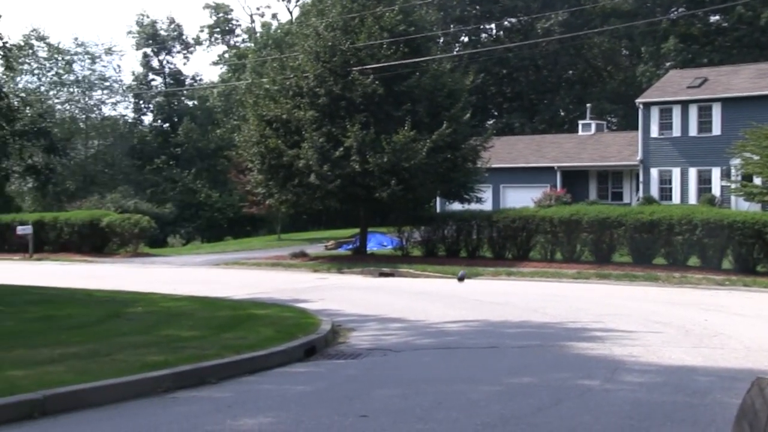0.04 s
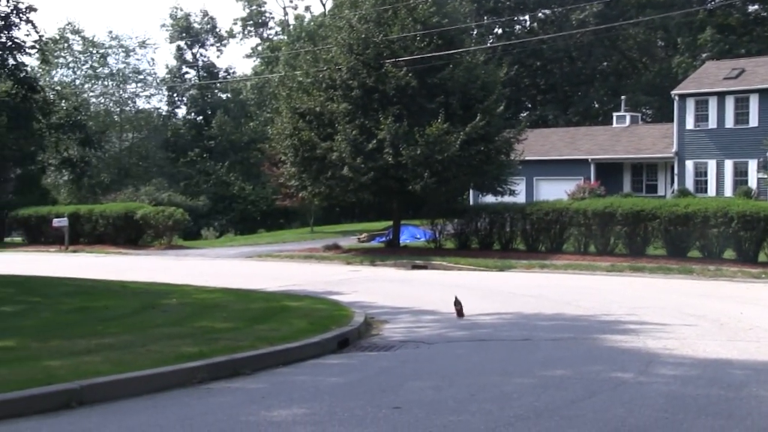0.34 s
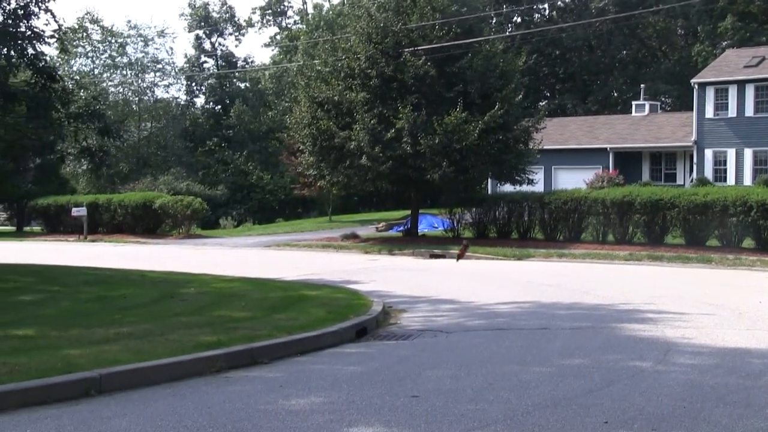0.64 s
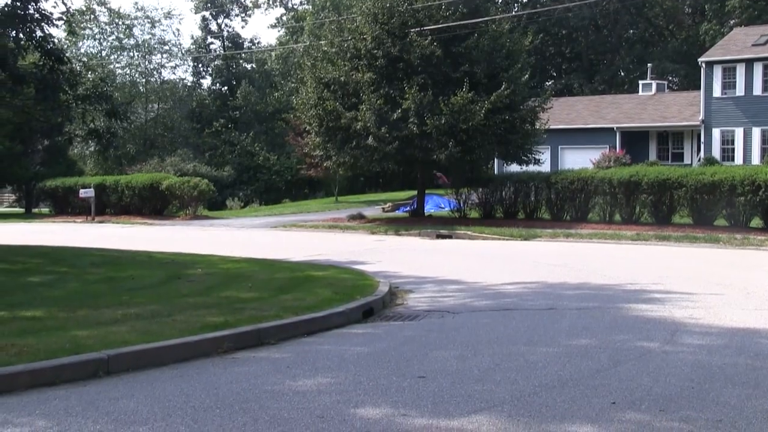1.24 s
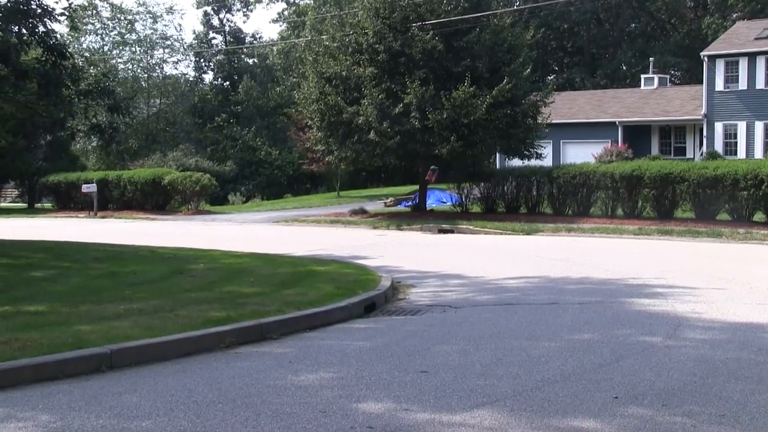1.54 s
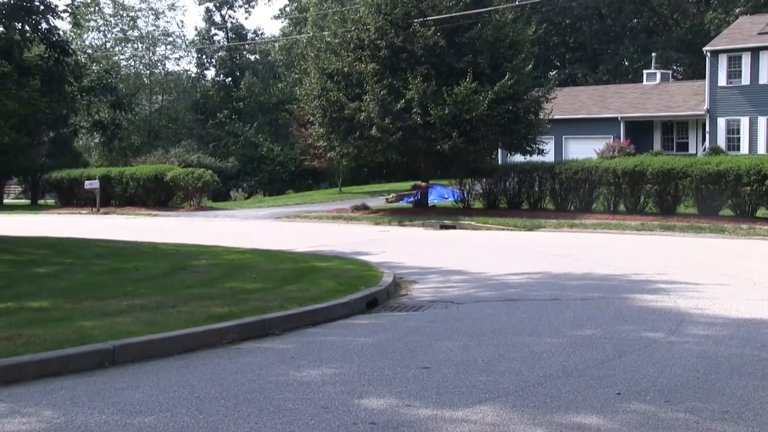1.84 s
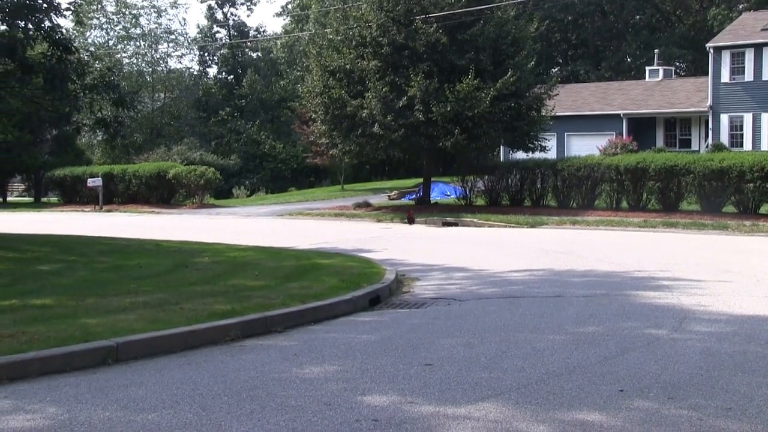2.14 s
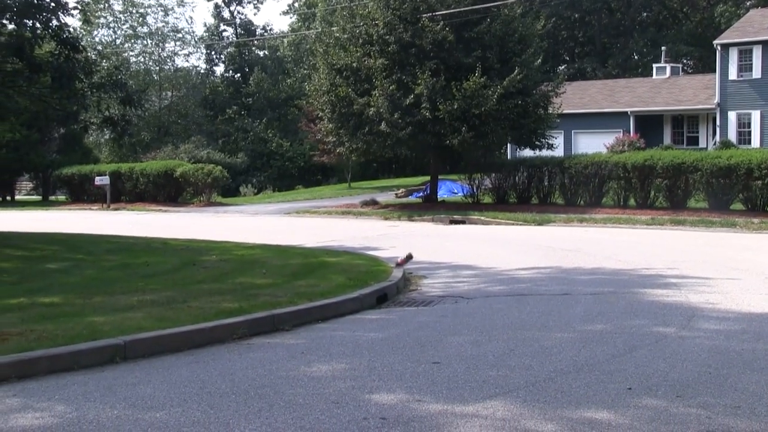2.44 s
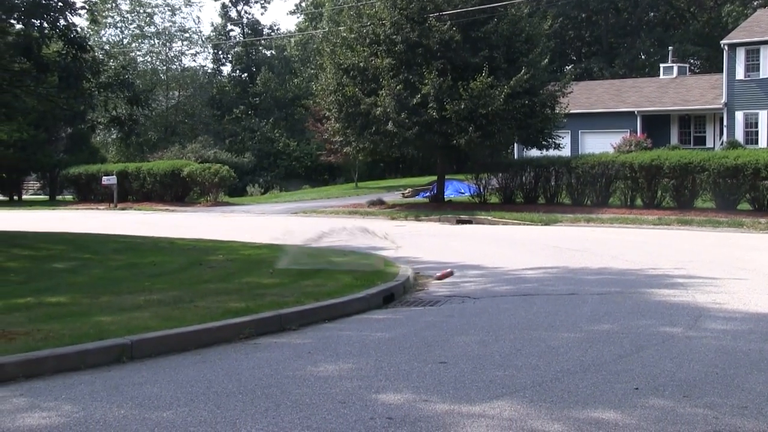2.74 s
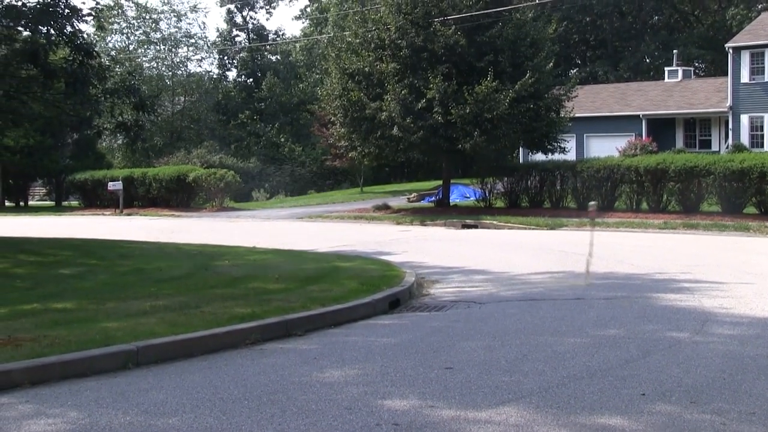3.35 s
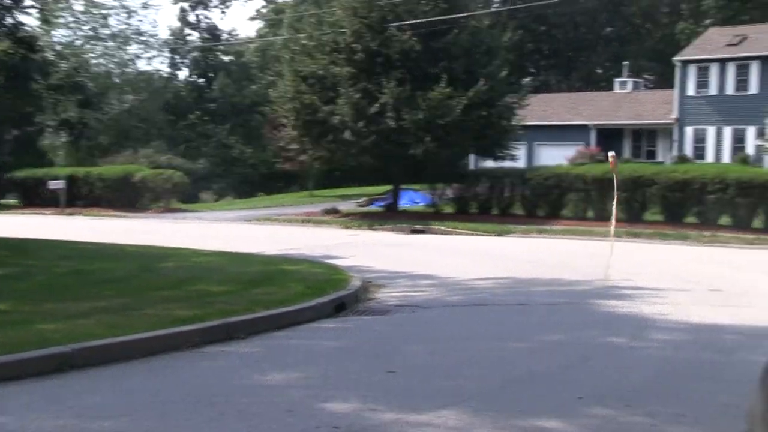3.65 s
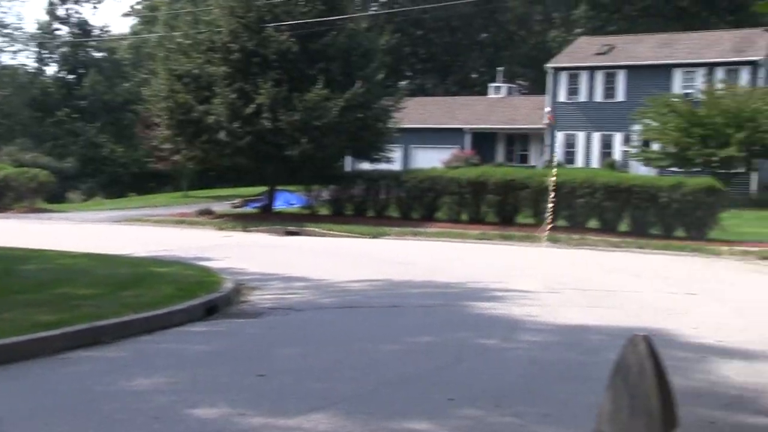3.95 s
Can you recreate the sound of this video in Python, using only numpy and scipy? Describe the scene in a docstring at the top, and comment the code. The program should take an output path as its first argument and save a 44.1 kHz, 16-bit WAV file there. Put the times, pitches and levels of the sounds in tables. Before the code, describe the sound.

A plastic soda bottle smacks onto a street, then bursts with a sputtering, hissing spray.

```python
"""A full plastic soda bottle slams onto a street; its wall buckles with a crack and its body rings.
On the second landing the neck snaps and escaping gas drives out gulps, wet slugs and a sputtering
jet of foam, which thins to hiss and spatter as the bottle flies off, drifting slightly right.
Trees and houses return a diffuse echo. Two faint knocks sound far down the street, and crickets
chirp over the hush of distant traffic and leaves."""
import sys
import numpy as np
from scipy import signal
from scipy.fft import rfft, irfft, next_fast_len
from scipy.io import wavfile
from scipy.ndimage import uniform_filter1d, map_coordinates

SR = 44100
rng = np.random.default_rng(int(sys.argv[2]) if len(sys.argv) > 2 else 0)


def digitize_waveform(pressure):
    """Quantize a signal to 16-bit integers and store it at the path in sys.argv[1].

    Rows of a 2-D input are taken as channels; values are limited to [-1, 1].
    """
    field = np.atleast_2d(pressure).T
    bounded = np.clip(field, -1, 1)
    quanta = np.round(bounded * 32767).astype(np.int16)
    wavfile.write(sys.argv[1], SR, quanta)


N = 176400

# Blows on the wall. Each row: start in seconds, crack level in dB, crack T60 in seconds,
# wall ring level in dB, body ring level in dB.
BLOWS = [(0.5557, -17, 0.025, -18, -42), (0.5596, -17.5, 0.021, -27, -35), (0.5626, -29, 0.009, -35, -18),
         (0.5737, -28.5, 0.061, -38, -42), (0.5829, -31, 0.0092, -35, -43)]
# Modes of the taut wall, the full bottle and a gulp. Each row: frequency in Hz, level in dB,
# T60 in seconds.
WALL_MODES = [(678, -4, 0.042), (1910, -2.5, 0.024), (2230, -1, .022), (2675, -4.5, .065),
              (3480, -9, 0.051)]
BODY_MODES = [(94.4, -12.5, 0.13), (163, -12, 0.098), (339, -3.5, 0.064), (392, -1, 0.067),
              (603, -10.5, 0.075), (1170, -12, 0.053), (1390, -13, 0.074)]
GULP_MODES = [(134, -15.5, 0.032), (191, -5.5, 0.049), (326, 2.5, 0.032), (575, -0.5, 0.026)]
# Snaps of hard plastic. Each row: start in seconds, level in dB, low cut in Hz, high cut in Hz.
SNAPS = [(2.7458, -1.5, 200, 12000), (2.7495, -13.5, 200, 9000), (2.761, -19, 600, 7030),
         (3.1922, -22.5, 905, 7000), (3.687, -23, 600, 6000), (3.7128, -21, 1500, 6500),
         (3.7776, -8, 2100, 6400), (3.7799, -15.5, 1800, 6000)]
# Partials of a snap. Each row: frequency in Hz, level in dB, time to the peak in seconds.
SNAP_PARTIALS = [(1250, -10.5, 0.00049), (1890, -15, .0016), (2650, -12, 0.00043), (4030, -15, 0.00062),
                 (4652, 0, .00055), (5550, -11, 0.0008), (7370, -17, 0.00052)]
# Slugs of soda in the neck. Each row: start in seconds, length in seconds, final level in dB,
# swell in dB, high cut in Hz.
SLUGS = [(2.898, .028, -16, 6.5, 12000), (3.038, 0.0197, -24.5, 11.5, 9000),
         (3.3928, 0.0042, -20.5, 5.5, 4970), (3.536, 0.0089, -24, 4, 3600)]
# Gulps at the neck and far knocks. Each row: start in seconds, level in dB.
GULPS = [(2.749, -28), (2.7898, -19.5), (2.797, -26), (2.811, -29), (2.854, -32.5)]
KNOCKS = [(1.005, -47.5), (1.287, -54.5)]
# Course of the jet. Each row: time in seconds, then relative levels in dB of flutter, roar and hiss.
JET_LEVELS = [(2.752, -34, -46, -25.5), (2.80, -42.5, -33.5, -36), (2.84, -38, -37, -35),
              (2.89, -47, -39, -37), (2.955, -40, -39, -31.5), (3.0, -42, -26.5, -33),
              (3.06, -41, -24.5, -31), (3.11, -51, -30, -28.5), (3.21, -47, -30.5, -35.5),
              (3.31, -49.5, -27, -33), (3.39, -49.5, -30, -33), (3.45, -49.5, -30.5, -36),
              (3.56, -46.5, -29.5, -37.5), (3.67, -46.5, -38, -33.5), (3.73, -58, -45.5, -36),
              (3.80, -53, -41.5, -32.5), (3.91, -51, -45.5, -37), (4.0, -58, -48, -38.5)]
# Spectra of the sources and the echo. Each row: frequency in Hz, relative level in dB.
CRACK_SPECTRUM = [(40, -23), (200, -11), (480, -8), (620, 1.5), (1000, -1.5), (1600, -4.5), (2400, -1.5),
                  (3000, -6.5), (3900, -2.5), (6000, -14), (7000, -17), (8300, -27.5), (10000, -66)]
SNAP_SPECTRUM = [(100, -8), (1000, 0), (7500, 0), (8500, -6), (10000, -27)]
SLUG_SPECTRUM = [(60, -31), (170, -19), (340, -1), (580, 0), (750, -5), (1550, -5), (2300, -1.5),
                 (3200, -9.5), (5000, -11.5), (7500, -24), (10000, -49.5)]
FLUTTER_SPECTRUM = [(30, -37), (70, -16), (150, -0.5), (350, 4.5), (500, 5.5), (1200, -37.5)]
ROAR_SPECTRUM = [(100, -47.5), (250, -16.5), (370, -2.5), (490, -8.5), (640, 0), (780, -1.5), (1050, 1.5),
                 (1600, -0.5), (2350, -0.5), (3200, -11), (5000, -15.5), (7500, -45), (10000, -65)]
HISS_SPECTRUM = [(300, -24), (1200, -11.5), (2500, -3), (3300, 0), (4500, -1.5), (5300, -5.5),
                 (6200, -13.5), (7200, -16.5), (8300, -38), (10000, -55.5)]
MIST_SPECTRUM = [(3000, -32), (6000, -2), (7300, 2), (8500, -4), (10000, -26.5)]
SPATTER_SPECTRUM = [(200, -21), (800, -9), (2000, -1.5), (4500, -2), (7000, -20), (8300, -37.5),
                    (10000, -44.5)]
ECHO_SPECTRUM = [(60, -7.5), (200, -1), (500, -6.5), (1000, -3), (3500, -2), (7000, 1), (10000, -10)]
KNOCK_SPECTRUM = [(200, -25), (600, -3), (1000, 5), (1400, -6), (2000, -3), (3000, -21), (6000, -37),
                  (10000, -65)]
HUSH_SPECTRUM = [(15, -44.5), (25, -17.5), (102, -2.5), (227, -4), (271, -2.5), (307, -5.5), (339, -0.5),
                 (425, -2), (546, -3.5), (2460, -17.5), (3670, -17.5), (4600, -20.5), (10000, -34),
                 (13000, -68), (22000, -120)]
# The bottle's path. Each row: time in seconds, rightward pan.
PAN_PATH = [(.55, 3.5), (2.75, 3.5), (3.05, 2.5), (3.4, 5), (4, 4.5)]
# Strength of the pan. Each row: frequency in Hz, right-over-left level in dB per unit of pan.
PAN_DEPTH = [(100, .1), (350, 0.55), (700, 0.44), (1400, 0.99), (2800, 1.5), (5000, 1.32), (8500, .1)]
# Decay of the echo. Each row: frequency in Hz, T60 in seconds.
ECHO_T60 = [(100, .6), (500, 1), (1500, 1.0), (4000, 1), (8000, 0.74)]
# Width of the echo. Each row: frequency in Hz, gain of the side signal in dB.
ECHO_WIDTH = [(80, -13), (300, -0.5), (2000, -2), (5000, -6), (9000, -8.5)]
# Crickets. Each row: first chirp in seconds, period in seconds, pitch in Hz, level in dB,
# chirp half-width in seconds.
CRICKETS = [(0.218, .2305, 3585, -67, 0.031), (0.2, .2225, 3820, -68, .034), (0.1, 0.19, 3930, -75, 0.056)]
# Likeness of the hush at the two ears. Each row: frequency in Hz, left-right correlation.
HUSH_COHERENCE = [(60, 1), (210, 0.56), (760, 0.35), (2710, 0.65), (9660, 0.56)]

SNAP_SHARPNESS = 3.3  # how steeply a snap swells and dies
SLUG_EDGE_S, SLUG_SWELL_SHARE = 0.001, 0.73  # the swell takes this share of a slug's length
JET_START_S, JET_RISE_S = 2.747, 0.0024
SPUTTER_DB, SPUTTER_GROWTH_DB_PER_S, SPUTTER_PER_S = 1.5, 1.5, 170
DROPS_PER_S, DROP_SPREAD_DB, SPATTER_DB = 260, 3.5, -6.5
MIST_DB, MIST_FADE_DB_PER_S = -15, 19.5  # the finest hiss dies with the pressure
TAIL_DB, EARLY_DB = -13, -14.5
BODY_ECHO_DB = -6.5  # little of the body's ring carries to the trees
CHIRP_BLUR_HZ, CHIRP_ARCH_HZ = 41, 14
HUSH_DB = -54.5
LOW_CUT_HZ, TOP_HZ = 73, 10270


def bottle_impact(body_db=0):
    """Impact excitation: each blow buckles the wall with a crack and rings the wall and body modes."""
    t, cracks, modes = np.arange(SR // 4) / SR, np.zeros(N), np.zeros(N)
    for start, crack_db, t60, wall_db, ring_db in BLOWS:
        crack = whiten(fade(t, t60) * rng.choice([-1, 1], len(t)))
        add(cracks, start, amp(crack_db) * crack)
        add(modes, start, amp(wall_db) * ring(WALL_MODES, rise_s=0.00056))
        add(modes, start, amp(ring_db + body_db) * ring(BODY_MODES, rise_s=0.0014))
    return coloured(cracks, CRACK_SPECTRUM) + modes


def plastic_snaps():
    """Brief transients are broadband: plastic breaks or hits asphalt in a few bright cycles."""
    t, out = np.arange(SR // 50) / SR, np.zeros(N)
    swell = lambda u: (u * np.exp(1 - u)) ** SNAP_SHARPNESS
    snap = sum(amp(db) * swell(t / peak) * np.sin(2 * np.pi * hz * t) for hz, db, peak in SNAP_PARTIALS)
    for start, db, low_hz, high_hz in SNAPS:
        add(out, start, amp(db) * band(snap, low_hz, high_hz))
    return shaped(out, SNAP_SPECTRUM)


def soda_slugs():
    """Slug flow: liquid tears through the neck as noise that swells, holds and stops abruptly."""
    t, out = np.arange(SR // 4) / SR, np.zeros(N)
    for start, length, db, swell_db, cut_hz in SLUGS:
        gate = np.clip(np.minimum(t, length - t) / SLUG_EDGE_S, 0, 1)
        progress = np.clip(t / (SLUG_SWELL_SHARE * length), 0, 1)
        swell = amp(db - swell_db * (1 - progress))
        rush = whiten(gate * swell * rng.standard_normal(len(t)))
        add(out, start, band(rush, LOW_CUT_HZ, cut_hz))
    return coloured(out, SLUG_SPECTRUM)


def foam_jet():
    """Jet noise: low flutter, foam roar and gas hiss sputter together; spatter follows the gas flow."""
    flutter_db, roar_db, hiss_db = curves(JET_LEVELS)
    age = np.maximum(np.arange(N) / SR - JET_START_S, 0)
    # The jet breaks up more as the bottle empties.
    sputter_db = (SPUTTER_DB + SPUTTER_GROWTH_DB_PER_S * age) * wobble(SPUTTER_PER_S)
    flutter = amp(flutter_db + 0.34 * sputter_db - 2) * noise(FLUTTER_SPECTRUM)
    roar = amp(roar_db + sputter_db + 0.31 * wobble(40) - 1.3) * noise(ROAR_SPECTRUM)
    hiss = amp(hiss_db + 0.56 * sputter_db - 2) * noise(HISS_SPECTRUM)
    drop_hits = rng.random(N) < DROPS_PER_S / SR
    drop_gains = amp(DROP_SPREAD_DB * np.clip(rng.standard_normal(N), -2, 2))
    drops = drop_hits * drop_gains * rng.choice([-1, 1], N)
    spatter = amp(hiss_db + SPATTER_DB) * unit(coloured(drops, SPATTER_SPECTRUM))
    mist = amp(hiss_db + MIST_DB - MIST_FADE_DB_PER_S * age) * noise(MIST_SPECTRUM)
    onset = np.clip(age / JET_RISE_S, 0, 1)
    return onset * (flutter + roar + hiss + mist + spatter)


def gas_gulps():
    """Damped resonance: gas pockets push through the liquid with short, low thuds."""
    out = np.zeros(N)
    for start, db in GULPS:
        add(out, start, amp(db) * ring(GULP_MODES, rise_s=0.0018))
    return out


def flight_pan(x):
    """Interaural level difference: a gain that varies with time and frequency sets the direction."""
    hz, t, spectra = signal.stft(x, SR, nperseg=256)
    pan_db = along(PAN_DEPTH, hz)[:, None] * np.interp(t, *np.transpose(PAN_PATH))
    ear_gains = amp(np.array([-pan_db, pan_db]) / 2)
    return signal.istft(spectra * ear_gains, SR, nperseg=256)[1][:, :N]


def street_echo(x):
    """Diffuse reflection: kerb and ground scatter early; trees and houses return a long tail."""
    hz, frame_s, spectra = signal.stft(rng.standard_normal((2, SR)), SR, nperseg=256)
    decay = fade(frame_s, along(ECHO_T60, hz)[:, None])
    colour = amp(along(ECHO_SPECTRUM, hz))[:, None]
    tail = signal.istft(spectra * decay * colour, SR, nperseg=256)[1]
    t = np.arange(tail.shape[1]) / SR
    tail *= np.clip(t / 0.035, 0, 1)
    early = rng.standard_normal(tail.shape) * fade(t, t60=0.068) * np.clip(t / 0.012, 0, 1) ** 2
    response = amp(TAIL_DB) * tail / np.linalg.norm(tail[0])
    response += amp(EARLY_DB) * early / np.linalg.norm(early[0])
    mid, side = signal.fftconvolve(x[None], response, axes=1)[:, :N]
    return stereo(mid, shaped(side, ECHO_WIDTH))


def far_knocks():
    """Treble loss over distance: woody knocks arrive as dull, quickly decaying noise."""
    t, out = np.arange(SR // 4) / SR, np.zeros(N)
    for start, db in KNOCKS:
        add(out, start, amp(db) * fade(t, t60=0.099) * rng.standard_normal(len(t)))
    return coloured(out, KNOCK_SPECTRUM)


def crickets():
    """Scattering by trees blurs each cricket's regular, arching chirp into narrowband noise."""
    t, out = np.arange(N) / SR, np.zeros((2, N))
    for first, period, pitch_hz, db, width in CRICKETS:
        offset = ((t - first + period / 2) % period - period / 2) / width  # from the nearest chirp
        phase = 2 * np.pi * np.cumsum(pitch_hz + CHIRP_ARCH_HZ * (1 - offset ** 2)) / SR
        blur = filtered(rng.standard_normal((4, N)), lambda hz: np.exp(-0.5 * (hz / CHIRP_BLUR_HZ) ** 2))
        mid, side = unit(blur[:2] * np.cos(phase) + blur[2:] * np.sin(phase))
        out += amp(db) * np.exp(-0.5 * offset ** 2) * stereo(mid, side / 2)
    return out


def hush():
    """Partial coherence: far traffic and leaves reach the two ears most alike in the bass."""
    def mid_side_gains(hz):
        angle = np.arccos(np.clip(along(HUSH_COHERENCE, hz), -1, 1)) / 2
        return np.array([np.cos(angle), np.sin(angle)])
    mid, side = filtered(np.array([noise(HUSH_SPECTRUM), noise(HUSH_SPECTRUM)]), mid_side_gains)
    return amp(HUSH_DB + 0.25 * wobble(5.4)) * unit(stereo(mid, side))


def ring(modes, rise_s):
    """Modal superposition: damped sines whose levels vary a little at each excitation."""
    t = np.arange(SR // 4) / SR
    partials = sum(amp(db + rng.normal(0, 1)) * fade(t, t60) * np.sin(2 * np.pi * hz * t)
                   for hz, db, t60 in modes)
    return (1 - np.exp(-t / rise_s)) * partials


def fade(t, t60):
    """Exponential decay, 60 dB in t60 seconds."""
    return np.exp(-np.log(1000) * t / t60)


def noise(spectrum):
    """Coloured noise of rms 1."""
    return unit(shaped(rng.standard_normal(N), spectrum))


def wobble(knots_per_s):
    """Smooth random modulation: a spline through Gaussian knots."""
    return map_coordinates(rng.standard_normal(N // 8), [np.arange(N) * knots_per_s / SR], order=3)


def filtered(x, response):
    """Zero-phase filtering by a gain that is a function of frequency."""
    size = next_fast_len(N + SR // 2)
    return irfft(rfft(x, size) * response(np.fft.rfftfreq(size, 1 / SR)), size)[..., :N]


def shaped(x, spectrum):
    """Zero-phase filtering by a table of levels."""
    return filtered(x, lambda hz: amp(along(spectrum, hz)))


def coloured(x, spectrum, size=4096):
    """Minimum-phase filtering: folding the cepstrum gives a causal response, scaled to unit energy."""
    cepstrum = irfft(np.log(amp(along(spectrum, np.fft.rfftfreq(size, 1 / SR)))))
    cepstrum[1:size // 2] *= 2
    cepstrum[size // 2 + 1:] = 0
    response = irfft(np.exp(rfft(cepstrum)))
    return signal.fftconvolve(x, response / np.linalg.norm(response))[:N]


def whiten(x, band_hz=250):
    """Spectral whitening: a short burst gets about the same energy in every band."""
    spectrum = rfft(np.pad(x, (SR // 8, SR // 8)))
    bins = round(band_hz * 2 * len(spectrum) / SR)
    power = np.abs(uniform_filter1d(np.abs(spectrum) ** 2, bins)) + 1e-20
    return irfft(spectrum * np.sqrt(power.mean() / power))[SR // 8:][:len(x)]


def band(x, low_hz, high_hz):
    """Gentle band-pass filtering."""
    return signal.sosfilt(signal.butter(2, [low_hz, high_hz], "band", fs=SR, output="sos"), x)


def along(points, hz):
    """Interpolation on a logarithmic frequency axis."""
    knots_hz, values = np.transpose(points)
    return np.interp(np.log(hz + 1), np.log(knots_hz + 1), values)


def curves(rows):
    """Linear interpolation in time, one curve for each column after the first."""
    times, *columns = np.transpose(rows)
    return [np.interp(np.arange(N) / SR, times, column) for column in columns]


def amp(db):
    """Decibels to amplitude."""
    return 10 ** (np.asarray(db) / 20)


def unit(x):
    """Normalisation to rms 1."""
    return x / np.sqrt(np.mean(x ** 2) + 1e-20)


def stereo(mid, side):
    """Sum and difference give left and right."""
    return np.array([mid + side, mid - side])


def add(track, start_s, sound):
    """Superposition of a sound on a track, in place."""
    part = track[round(start_s * SR):][:len(sound)]
    part += sound[:len(part)]


def scene(directions=4):
    """Superposition: the bottle and its echoes are panned together over the still background."""
    burst = plastic_snaps() + gas_gulps() + soda_slugs() + foam_jet()
    echoes = street_echo(burst)
    # The buckling wall sends a different crack in each direction.
    echoes += sum(street_echo(bottle_impact(BODY_ECHO_DB))
                  for _ in range(directions)) / np.sqrt(directions)
    bottle = flight_pan(bottle_impact() + burst + echoes)
    low_cut = signal.butter(2, LOW_CUT_HZ, "high", fs=SR, output="sos")
    return signal.sosfilt(low_cut, bottle) + far_knocks() + hush() + crickets()


def record(dry):
    """Band limiting: nothing above TOP_HZ passes."""
    return filtered(dry, lambda hz: hz < TOP_HZ)


dry = scene()
out = record(dry)
digitize_waveform(out)
```